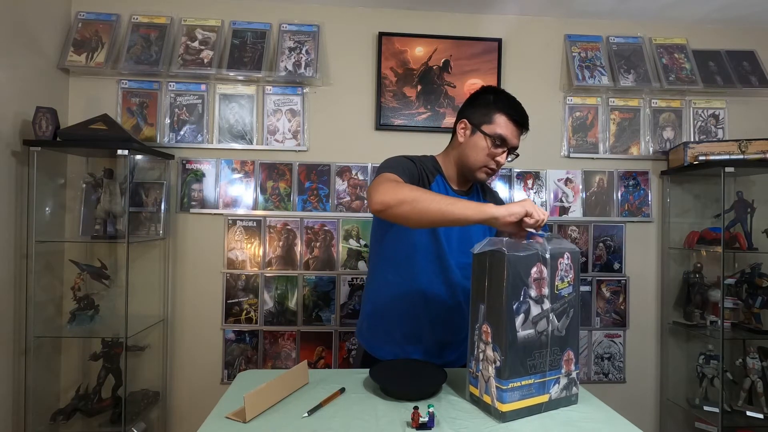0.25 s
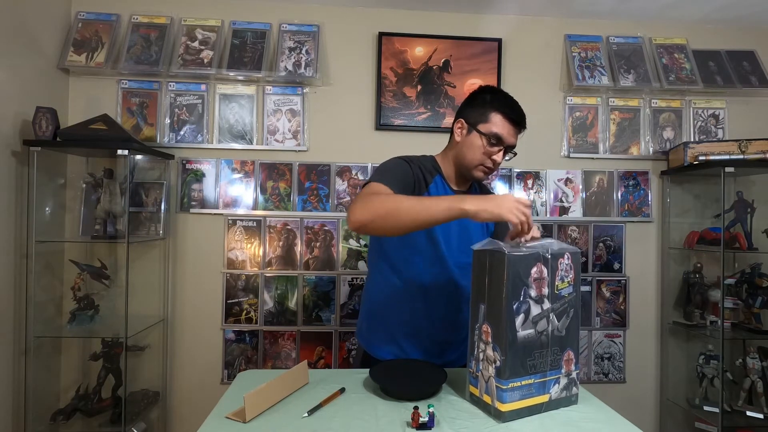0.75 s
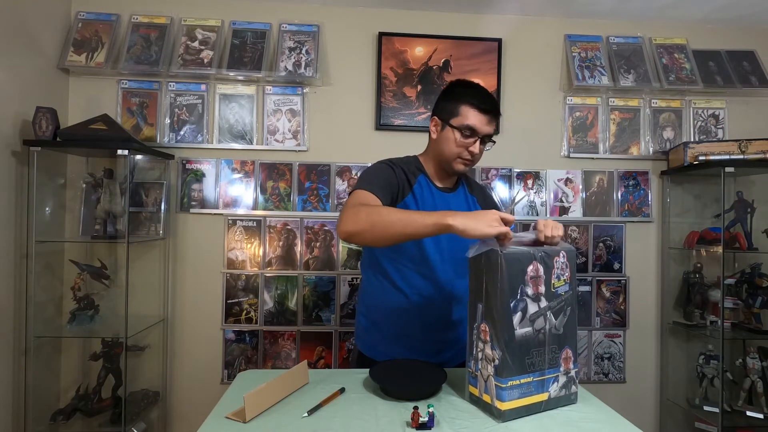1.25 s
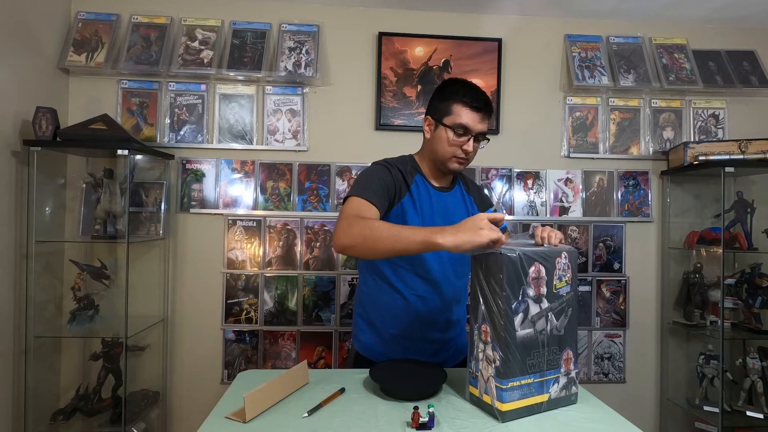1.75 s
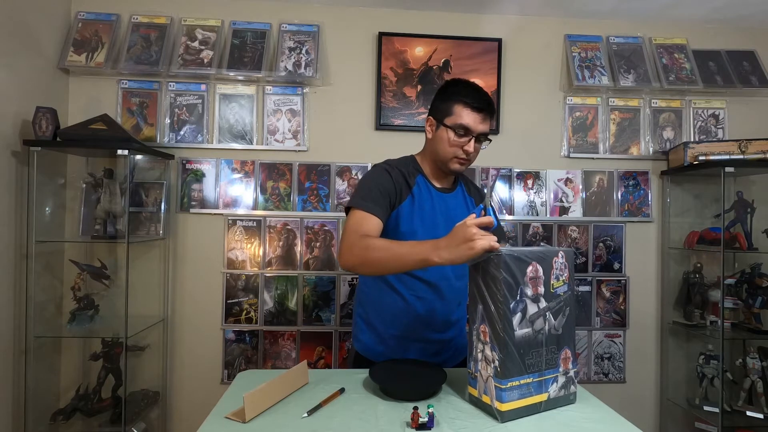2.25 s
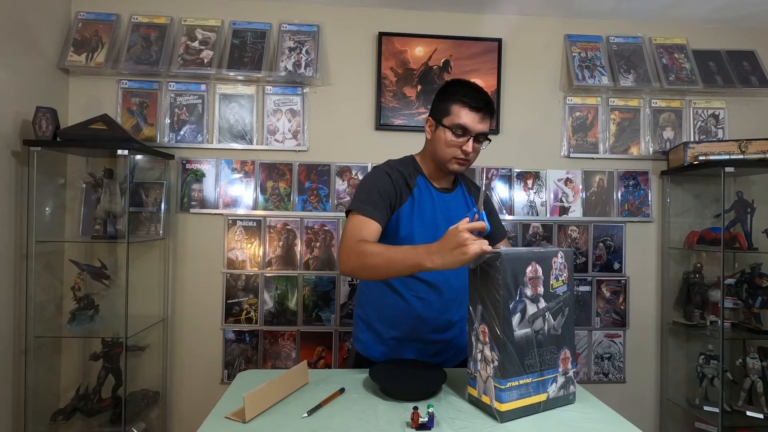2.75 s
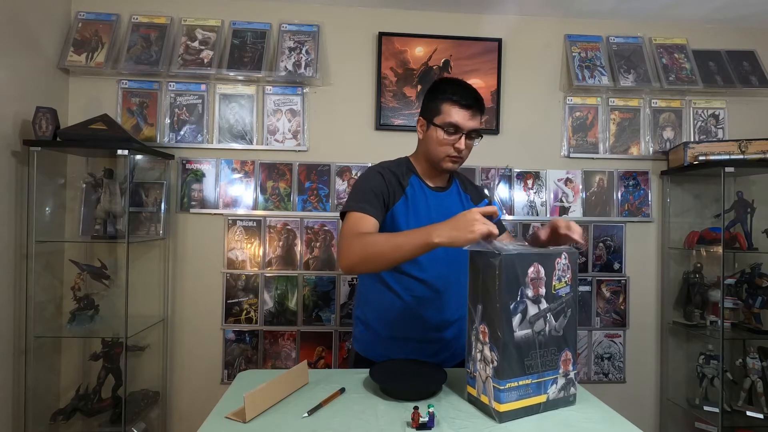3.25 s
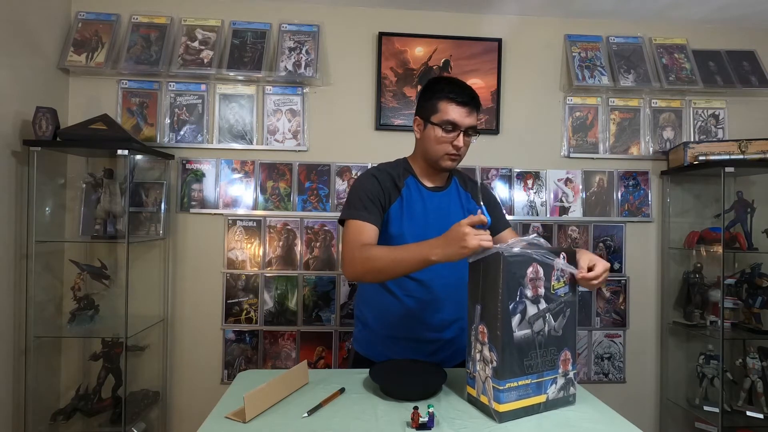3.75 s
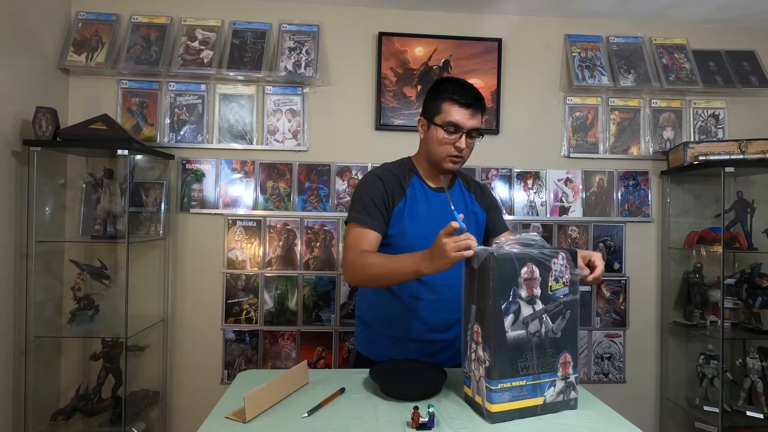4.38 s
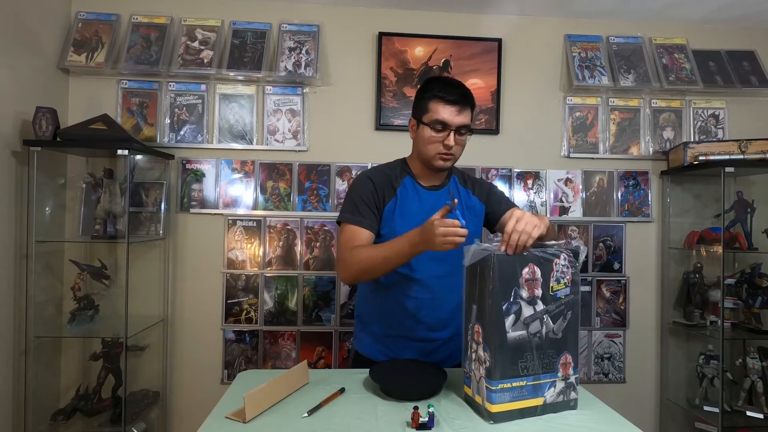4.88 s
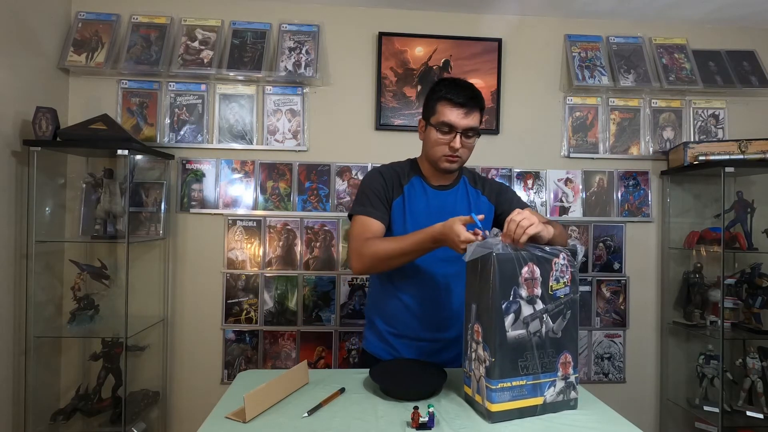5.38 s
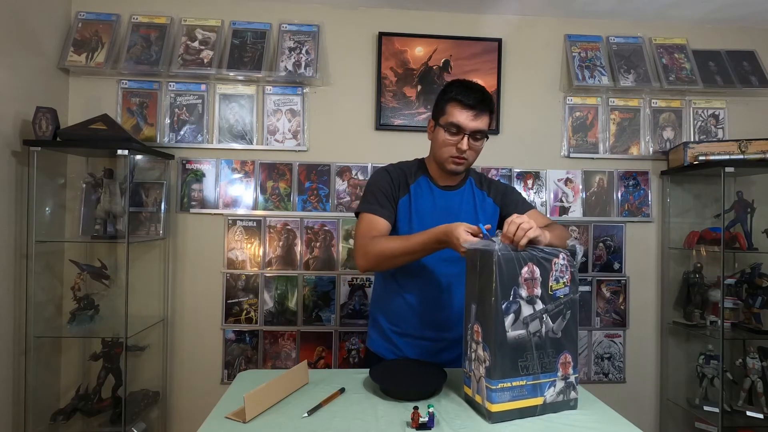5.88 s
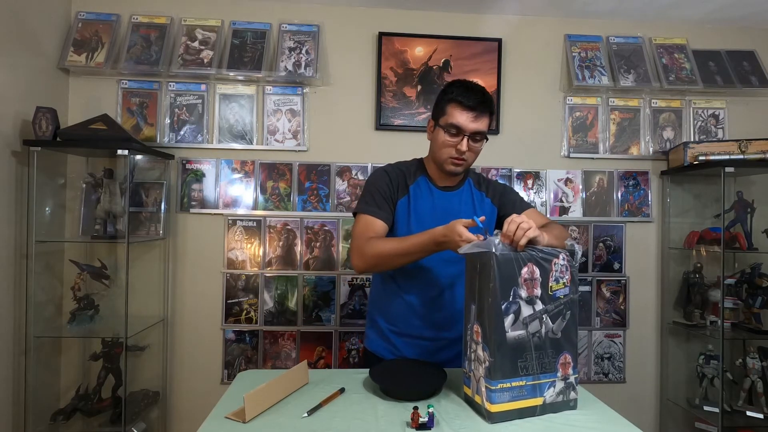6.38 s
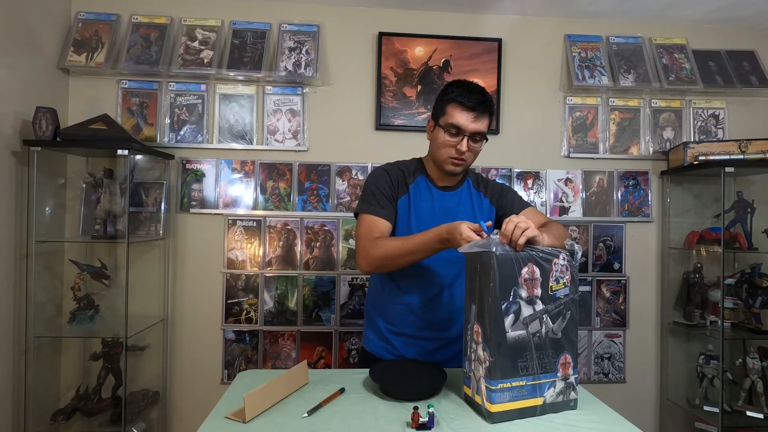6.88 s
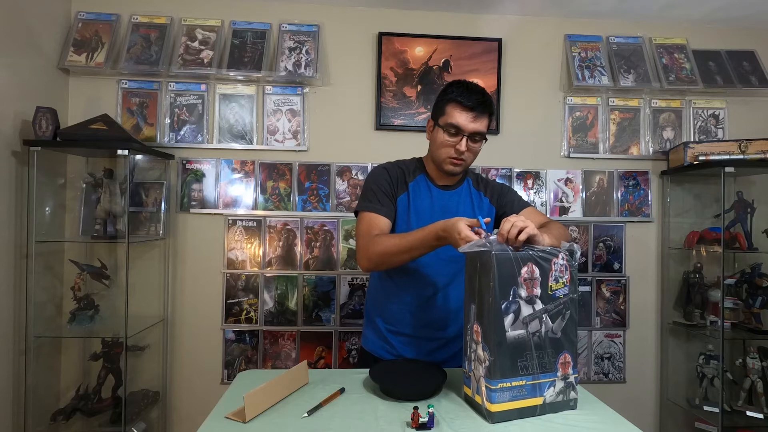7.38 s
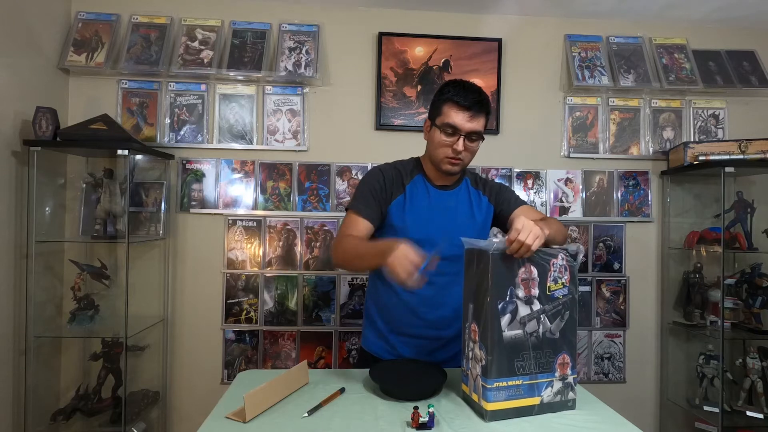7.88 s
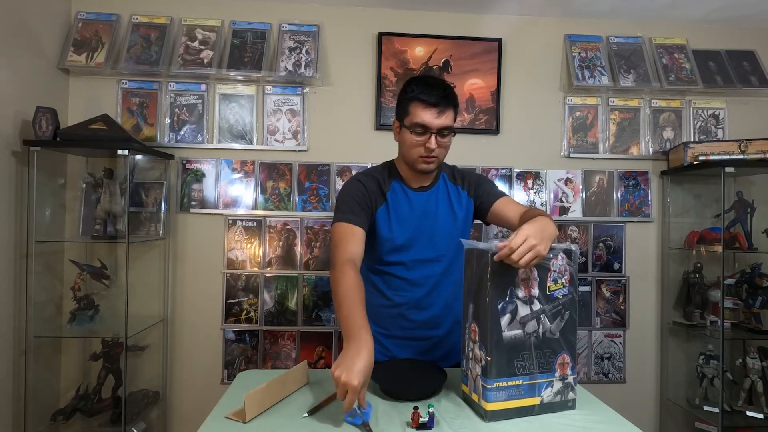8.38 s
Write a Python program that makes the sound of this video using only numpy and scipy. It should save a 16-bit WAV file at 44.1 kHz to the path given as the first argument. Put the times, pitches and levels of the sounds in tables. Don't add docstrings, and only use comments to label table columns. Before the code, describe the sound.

Hands tug and tear clear plastic film on a cardboard box in a furnished room. Irregular dry crackles and sharp snaps come in short pulls, busier at first, then sparser as a seam is picked. Near the end a small cutter taps the table, lands and bounces. Soft low thumps of moving air buffet the stereo microphone a few steps away, over a steady house hum.

```python
import sys
import numpy as np
from scipy import signal
from scipy.fft import rfft, irfft
from scipy.io import wavfile
from scipy.ndimage import uniform_filter1d

SR = 44100
rng = np.random.default_rng(int(sys.argv[2]) if len(sys.argv) > 2 else 0)


def gain_from_decibels(decibels):
    exponent = np.asarray(decibels, float) / 20
    return 10 ** exponent


def master(y):
    cut = np.clip(np.atleast_2d(y).T, -1, 1)
    pcm = np.round(cut * 32767)
    wavfile.write(sys.argv[1], SR, pcm.astype(np.int16))


N = 381024

# start_s, length_s, level_db, change_during_pull_db
PULLS = [(0, 0.26, -45.5, -32), (0.338, 0.18, -41, -12.5), (0.626, 0.3, -54.5, 3), (0.85, 0.16, -43, -12.5),
         (1.021, 0.29, -48, 5.5), (1.396, 0.28, -46.5, -4), (1.767, 0.13, -55.5, 2.5),
         (1.968, 0.3, -51.5, 0), (2.3, 0.14, -53, -1), (2.516, 0.41, -51.5, -18.5), (2.948, 0.27, -52, 4),
         (3.189, 0.048, -43.5, -7.5), (3.308, 0.04, -56, 2), (3.438, 0.15, -56.5, 11.5),
         (3.629, 0.36, -47, 0), (4.087, 0.1, -55.5, 6.5), (4.234, .18, -42.5, -7.5),
         (4.456, 0.19, -44.5, -11), (4.8, 0.069, -60, -5), (4.882, 0.21, -60, 6.5),
         (5.144, 0.17, -51.5, -9), (5.43, 0.38, -60.5, -6.5), (5.759, 0.09, -51, -6.5),
         (6.07, 0.21, -63, 5), (6.545, 0.22, -64.5, 0), (6.93, 0.13, -71.5, 5), (6.8, 0.062, -66.5, -7),
         (7.217, .25, -70, 5), (7.549, 0.27, -44.5, -21), (7.86, 0.36, -61.5, 8), (8.412, 0.1, -58, 1)]
SLACK_DB, GRIP_DB_PER_S, LET_GO_DB_PER_S = -77.5, 899, 297
# frequency_hz, density_db_per_hz
FILM_SPECTRUM = [(700, -5), (1200, 5), (2400, 3), (4200, 5), (6000, 2.5), (8600, -3), (12500, -15.5),
                 (15500, -12)]
SIZES_HZ = np.geomspace(750, 13000, num=14)
# start_s, peak_db, ring_hz, treble_over_peak_db
TEAR_SNAPS = [(.001, -31, 2430, -22), (0.332, -28.5, 3420, -7), (0.3411, -29.5, 2230, -16),
              (0.4, -31.5, 2200, -11), (0.482, -33, 2570, -23), (0.634, -38.5, 4270, -9),
              (0.7267, -30.5, 3680, -14), (0.8276, -38, 3400, -33), (0.873, -30.5, 3730, -13),
              (0.9169, -28, 1930, -25.5), (1.0351, -35, 2593, -30), (1.2034, -42, 2330, -34),
              (1.413, -34.5, 3000, -41), (1.6477, -30, 2320, -4.5), (1.7235, -27, 4550, -5.5),
              (1.8211, -37.5, 2530, -10), (1.9973, -38, 4450, -22), (2.0665, -33.5, 2370, -14),
              (2.546, -42.5, 1509, -2), (2.7243, -37.5, 2938, -13), (2.797, -35.5, 2924, -6.5),
              (2.943, -48.5, 1824, 10), (3.122, -32.5, 2854, -30), (3.1975, -33, 2130, -32),
              (3.22, -37, 5970, -2), (3.4232, -39, 3550, -7), (3.6509, -27, 4700, -13),
              (3.9733, -40, 3420, -22), (4.2734, -39, 2958, -32), (4.3319, -33.5, 1824, -17)]
# start_s, peak_db, ring_hz, treble_over_peak_db
PICK_SNAPS = [(4.89, -31, 1268, -18), (4.998, -41, 3133, -6), (5.028, -30.5, 3200, -5.5),
              (5.152, -29.5, 1772, -8), (5.217, -36.5, 2160, -33), (5.443, -39, 1473, -28),
              (5.6045, -39, 2830, -10.5), (5.7563, -36.5, 1870, -18), (5.835, -34.5, 2694, -20),
              (6.0896, -28, 3905, -5.5), (6.2163, -28.5, 1740, -14.5), (6.3551, -47, 1775, -26),
              (6.545, -41.5, 1786, -29), (6.6322, -38, 2440, -18), (6.6824, -36.5, 1910, -10.5),
              (6.7168, -38, 3918, -29), (6.9025, -40, 3900, -14), (6.993, -35.5, 2303, -25),
              (7.2448, -45, 1482, -41), (7.2928, -38, 1990, -12.5), (7.3442, -30.5, 2736, -16.5),
              (7.418, -33, 1467, -10.5), (7.538, -32, 2470, -23), (7.5433, -20, 2400, -16.5),
              (7.7309, -41, 1311, -34), (7.86, -40.5, 4000, -18), (7.926, -33.5, 1490, -8.5),
              (8.0282, -34, 4433, -6), (8.1234, -38.5, 1818, -7), (8.315, -33.5, 4756, -9)]
# start_s, peak_db, ring_hz, treble_over_peak_db
SMALL_SNAPS = [(0.2162, -39.5, 1350, -25), (0.4183, -24.5, 1930, -22), (0.5906, -42, 1860, -18),
               (0.6722, -42, 1490, -29), (0.7563, -28, 2350, -9), (1.4813, -37, 3019, -21),
               (1.5897, -33.5, 2560, -15), (1.8682, -35, 3800, -20), (1.9756, -35, 4340, -26),
               (2.0444, -33, 1910, -21), (2.2043, -33.5, 3300, -13), (2.3228, -34.5, 3140, -8),
               (2.432, -34.5, 1430, -17), (2.4775, -41, 2630, -22), (2.504, -35, 3620, -21),
               (2.6997, -44.5, 1371, -33), (2.759, -36, 3240, -27), (2.9025, -45, 4993, -16),
               (2.9845, -30.5, 3220, -8), (3.4938, -37, 3313, -26), (3.6758, -32, 2430, -11),
               (3.7082, -39.5, 1913, -12), (3.8652, -30, 3526, -8), (4.116, -47, 1267, 1),
               (4.1776, -37, 4516, -16), (4.2306, -40, 1970, -11), (4.4624, -37.5, 2377, -18),
               (4.6267, -52, 1883, -21), (4.8073, -47, 1570, -23), (5.1263, -42, 1847, -13),
               (5.418, -47, 1205, -10), (5.5818, -40.5, 1650, -13), (5.675, -49, 1217, -20),
               (5.7033, -46, 2893, -23), (6.0466, -47, 1203, -13), (6.509, -53, 1220, -23),
               (6.764, -38, 3500, -14), (7.1169, -53, 1230, -28), (7.2194, -47, 1235, -18),
               (7.6783, -41, 2334, -20), (7.8016, -39, 1384, -25), (8.1627, -36.5, 1362, -15),
               (0.309, -47, 1600, -45), (7.908, -38, 950, -45), (6.9, -36, 1270, -30),
               (6.566, -39, 4500, 0), (7.9, -36, 1100, -34), (3.9, -31.5, 1300, -30),
               (6.219, -26.5, 650, -38), (1.5, -30, 3800, -20), (0.67, -34, 6500, -25),
               (1.626, -38, 4500, -18), (1.638, -40, 8000, -5), (1.808, -42, 2900, -20),
               (3.782, -35, 2700, -11), (4.7, -33, 2200, -10), (8.4, -44, 1780, -19),
               (6.889, -55, 2670, -37), (7.032, -40, 2670, -25), (6.5, -47, 12000, 1), (8.5, -37, 5014, -5),
               (7.549, -26, 2700, -17), (6.2, -45, 3000, -5), (8.487, -58, 4500, -8),
               (3.982, -27, 3400, -8)]
# start_s, peak_db, ring_hz
BRIGHT_TICKS = [(0.838, -53, 8640), (1.097, -52, 8700), (1.1694, -65, 7740), (1.4274, -48, 8960),
                (1.9085, -57, 8460), (2.094, -44, 7630), (2.159, -46, 8400), (2.261, -46, 8300),
                (2.9113, -53, 7720), (3.7458, -56, 8490), (3.9817, -52, 8850), (4.0375, -39, 8500),
                (4.085, -44.5, 8360), (4.115, -43, 8690), (4.177, -45.5, 8850), (4.5038, -44.5, 8144),
                (4.573, -46, 8370), (4.644, -46, 8600), (5.299, -64, 7520), (5.7196, -51, 8830),
                (6.517, -65, 8186), (8.1762, -45.5, 8285), (8.321, -38.5, 7790), (8.4342, -45, 9420)]
PRICK_DB = 13
AIMED_DB = -9
# start_s, peak_db, rattle_length_s, landing_share (0-1)
KNOCKS = [
    (8.3333, -28.5, 0.025, 0),
    (8.5011, -15.5, 0.018, 0.8),
    (8.5432, -12.5, 0.018, 0.92),
    (8.593, -41, 0.014, 0.9),
]
# frequency_hz, width_hz, level_db
TOUCH_MODES = [(730, 220, 6), (1010, 71, 9), (1810, 154, 4), (2430, 147, -5), (2698, 73, 1),
               (2930, 147, 3.5), (3800, 234, -24), (4710, 300, -21), (5900, 357, -11)]
# frequency_hz, width_hz, level_db
LANDING_MODES = [(525.7, 38, 4), (1049, 1400, 12.5), (1760, 80, -8), (2330, 750, 6), (3900, 1200, 6.5),
                 (3420, 110, 9), (2325, 79, -1), (645, 204, 6), (5096, 730, -10)]
# left_delay_ms, right_delay_ms, level_db
NEAR_ECHOES = [(0.43, 0.34, -14), (1.13, 1.33, -16.5), (2.3, 2.05, -14), (3.7, 4.1, -13), (5.9, 5.3, -11)]
# frequency_hz, t60_s
ROOM_DECAY = [(500, 0.39), (1300, 0.34), (3500, 0.29), (9000, 0.2), (15000, 0.23)]
# frequency_hz, level_db
WALL_COLOUR = [(1000, -4), (4000, 1.36), (8000, -2), (13000, -1)]
# frequency_hz, left_over_right_db
PORT_BALANCE = [(500, -1), (2400, 1), (4400, 0), (8000, -1.5), (15000, -7)]
LEFT_SHARE = 1 / 2
LAG = 1.8
# frequency_hz, level_db
MIC_RESPONSE = [(9000, 2), (13000, -5.5), (15000, -16), (16000, -10), (17000, -57)]
# start_s, length_s, level_db, flutter_over_rumble_db
LEFT_GUSTS = [(.243, 0.12, -25, -15), (.42, 0.12, -36, -10), (1.152, 0.16, -27, -15),
              (1.608, 0.081, -26, -20), (1.726, 0.15, -32, -12), (2.018, 0.38, -24, -11),
              (2.515, 0.18, -24.5, -11), (3.041, 0.085, -21, -16), (3.17, 0.17, -27.5, -10),
              (3.43, 0.06, -24.5, -9), (3.866, 0.097, -34, -18), (4.145, 0.19, -27, -17),
              (4.408, 0.12, -26, -17), (4.875, 0.18, -33, -12), (5.195, 0.27, -24.5, -11),
              (5.43, 0.05, -31.5, -14), (6.297, 0.0974, -24, -10.5), (6.553, 0.43, -25.5, -14),
              (7.05, 0.26, -29.5, -14), (7.41, 0.31, -27, -18), (7.859, 0.11, -26.5, -9),
              (8.018, 0.14, -25.5, -17.5), (8.184, 0.14, -27, -13.5), (8.351, 0.13, -21.5, -15.5),
              (8.58, 0.084, -27.5, -14)]
# start_s, length_s, level_db, flutter_over_rumble_db
RIGHT_GUSTS = [(.125, 0.26, -28, -14), (.85, 0.23, -41, -8), (1.188, 0.14, -26, -6), (1.401, 0.14, -25, -9),
               (1.617, 0.18, -26.5, -9), (2.109, 0.085, -27, -8), (2.259, 0.14, -26, -4),
               (2.52, 0.16, -25.5, -7), (2.93, 0.095, -25, -10), (3.084, 0.18, -23, -6),
               (3.44, 0.052, -27, -3), (3.599, 0.099, -34, -16), (3.85, 0.13, -26.5, -7),
               (4.165, 0.1293, -21, -4), (4.42, 0.12, -27, -8), (4.91, 0.11, -28, -6),
               (5.204, 0.2, -27, -5), (5.51, 0.14, -34, -15), (5.75, 0.11, -32, -17),
               (6.261, 0.073, -23.5, -7), (6.397, 0.059, -25.5, -6), (6.56, 0.19, -33, -10),
               (6.837, 0.18, -22, -7), (7.224, 0.077, -33, -15), (7.42, 0.12, -36, -12),
               (7.637, 0.11, -27.5, -13), (7.83, 0.13, -24.5, -7), (8.03, 0.36, -24, -4)]
CALM_DB, CALM_FLUTTER_DB = -49, -12
GUST_RISE_DB_PER_S, GUST_FALL_DB_PER_S = 520, 230
# start_s, peak_db, sharpness_db, lean_left_db
EDDIES = [(1.221, -25, -15, -28), (1.27, -25.5, -26.5, -11), (1.481, -25.5, -27, -20),
          (1.641, -26.5, -30, -10.5), (1.801, -33.5, -12, -3), (2.15, -25.5, -13, 2),
          (2.264, -23.5, -9, 14), (2.333, -15.5, -16, 6), (2.398, -20, -11.5, 8), (2.528, -22.5, 1, 5),
          (2.545, -23.5, -7.5, 3.5), (2.996, -27, -19, -22), (3.183, -25, -11, 8), (3.458, -16, -11.5, -1),
          (3.972, -24, -14.5, -28), (4.198, -25.5, -11.5, -26.0), (4.432, -21, -15.5, 1.5),
          (5.241, -18.5, -20.5, 10), (5.355, -20, -12.5, 3), (6.298, -24.5, -26, -25),
          (6.419, -19, -22, -37), (6.853, -28.5, -12.5, 11), (6.896, -30, -4, -31),
          (6.981, -21.5, -24, -14), (7.541, -32.5, -15.5, 5), (7.861, -23, -26, -21),
          (7.914, -23.5, -16, -18), (8.143, -22, -8.5, -25), (8.286, -25, -15.5, -26),
          (8.361, -27, -15, -1), (8.197, -24, -10, -23), (.276, -28, -20.5, 10), (0.303, -28.5, -29, 3),
          (2.104, -53, -11, -10), (3.868, -42, -12, -7), (4.508, -31, -17, -2), (4.52, -29.5, -16.5, -3),
          (4.927, -37, -22, -13), (4.947, -42, -21, -2), (6.051, -38.5, -27, -2),
          (6.906, -25.5, -12.5, -21), (8.093, -30, -22, -15), (8.447, -25, -18.5, 9), (2.128, -42, -17, -3),
          (2.42, -33.5, -4, 9), (2.67, -33, -12, 3), (4.225, -29.5, -9, -24), (8.17, -26.5, -15, -11),
          (1.31, -30, -19, -17), (8.061, -44, -20, 2)]
# frequency_hz, density_db_per_hz
HOUSE_SPECTRUM = [(40, 8.5), (130, -0.5), (260, 5.5), (350, -1.5), (480, -6), (600, -14.5), (860, -39),
                  (1300, -27), (2000, -33), (5000, -53), (9000, -51), (16000, -81)]
HOUSE_DB = -49
# frequency_hz, width_hz, level_db
MOTOR_TONES = [(775, 57, -74.5), (1046, 220, -71.5), (1310, 46, -83.5)]


def crinkle():
    clumps = gain_from_decibels(5.5 * evened(uniform_filter1d(rng.standard_normal(N), 500)))
    wide = ticks(220 * clumps)
    local = [ticks(300 * clumps) for _ in range(5)]
    out = np.zeros(N)
    for k, grain in enumerate(creases(1.07)):
        train = (-1) ** k * 1.28 * wide + 0.76 * local[k // 3]
        out += signal.oaconvolve(train, grain)[:N]
    slow_power = abs(uniform_filter1d(out ** 2, size=9000)) / np.mean(out ** 2)
    out /= np.sqrt(slow_power + 0.42)
    return out * pulling() * gain_from_decibels(-19)


def pulling():
    level_db, change_db = np.transpose(PULLS)[2:, :, None]
    below_db, progress = swells(PULLS, GRIP_DB_PER_S, LET_GO_DB_PER_S)
    power = gain_from_decibels(level_db + change_db * progress + below_db) ** 2
    return per_sample(np.sqrt(power.sum(0) + gain_from_decibels(SLACK_DB) ** 2))


def ticks(per_s):
    at = np.flatnonzero(rng.random(N) < per_s / SR)
    train = np.zeros(N)
    size_db = 5.4 * np.minimum(rng.exponential(1, N)[at], 3.2)
    train[at] = gain_from_decibels(size_db) * rng.choice([-1, 1], N)[at]
    return evened(train)


def creases(cycles):
    rings = np.array([ring(hz, cycles) for hz in SIZES_HZ])
    weight = gain_from_decibels(read(FILM_SPECTRUM, SIZES_HZ)) * np.sqrt(SIZES_HZ / 3200)
    return rings * (weight / np.linalg.norm(rings, axis=1))[:, None]


def ring(hz, cycles):
    turns = np.arange(400) * hz / SR
    wave = np.sin(2 * np.pi * turns) * np.exp(-turns / max(cycles, .2)) * (1 - np.exp(-turns / 0.085))
    return wave / abs(wave).max()


def snaps():
    out, bank = np.zeros(N), creases(0.58)
    large = TEAR_SNAPS + PICK_SNAPS
    for (s, db, hz, treble_db), chance in zip(large, rng.random((len(large), 3, 5))):
        add(out, s, gain_from_decibels(db) * flip(bank, hz, treble_db))
        for later, weaker, pick in chance.T:
            part = bank[int(pick * 9) + 2]
            add(out, s + .014 * later, gain_from_decibels(db - 4.5 - 15.6 * weaker) * part / abs(part).max())
    for s, db, hz, treble_db in SMALL_SNAPS:
        add(out, s, gain_from_decibels(db - 4.0) * flip(bank, hz, treble_db))
    for s, db, hz in BRIGHT_TICKS:
        add(out, s, gain_from_decibels(db + 11.0) * ring(hz, 0.54))
    return out


def flip(bank, hz, treble_db):
    near_db = 5.0 * np.exp(-(np.log2(SIZES_HZ / hz) / 0.59) ** 2)
    near_db -= 4.4 * np.maximum(np.log2(hz / SIZES_HZ) - 0.6, 0)
    signs = (-1) ** np.arange(len(bank))
    click = (gain_from_decibels(tilt(treble_db + 8.0) + near_db) * signs) @ bank
    return click / abs(click).max()


def tilt(treble_db):
    return np.multiply.outer(np.maximum(np.log2(SIZES_HZ / 3200), 0) / 1.5, treble_db)


def pricks():
    out = np.zeros(N)
    large = TEAR_SNAPS + PICK_SNAPS
    for (s, db, hz, treble_db), chance in zip(large, rng.random(len(large))):
        add(out, s, gain_from_decibels(db + treble_db + PRICK_DB) * ring(9000 + 3500 * chance, 1.0))
    return out


def sparkle():
    clumps = gain_from_decibels(6.0 * evened(uniform_filter1d(rng.standard_normal(N), 700)))
    out = []
    for hz, db in ((8000, -3), (8600, -3), (13200, 4), (13900, 5)):
        out.append(gain_from_decibels(db) * signal.oaconvolve(ticks(150 * clumps), ring(hz, 0.8))[:N])
    return np.reshape(out, (2, 2, N)).sum(0) * pulling() * gain_from_decibels(-44)


def cutter():
    out, t = np.zeros(N), np.arange(4000) / SR
    for s, db, length, share in KNOCKS:
        share = np.clip(share, 0, 1)
        rattle = rng.standard_normal(len(t)) * abs(rng.standard_normal(len(t))) * np.exp(-t / length)
        rattle[:3] += 3.2
        sound = (0.36 + 0.16 * share) * evened(colour(rattle, FILM_SPECTRUM) * (t > 0))
        for modes, part in ((TOUCH_MODES, 1 - share), (LANDING_MODES, share)):
            bell = np.zeros(len(t))
            for k, (hz, width, level) in enumerate(modes):
                decay = np.exp(-np.pi * width * t)
                bell += (-1) ** k * gain_from_decibels(level) * width * np.sin(2 * np.pi * hz * t) * decay
            sound += part * evened(signal.fftconvolve(rattle, bell)[:len(t)])
        add(out, s, gain_from_decibels(db) * sound / abs(sound).max())
    return out


def echoed(pair):
    taps = np.zeros((2, 400))
    taps[:, 0] = 1
    for k, (left_ms, right_ms, db) in enumerate(NEAR_ECHOES):
        delays = np.round(np.array([left_ms, right_ms]) * SR / 1000).astype(int)
        taps[[0, 1], delays] = (-1) ** k * gain_from_decibels(db)
    return signal.oaconvolve(pair, taps / np.linalg.norm(taps[0]), axes=1)[:, :N]


def room(x):
    slots = np.arange(40, SR // 2 - 20, 14)
    taps = np.zeros((4, 3, SR // 2))
    places = slots + rng.integers(0, 14, (4, 3, len(slots)))
    np.put_along_axis(taps, places, rng.choice([-1., 1.], (4, 3, len(slots))), 2)
    hz, t, z = signal.stft(taps, SR, nperseg=128)
    same = np.clip(read([(600, 0.94), (2400, 0.77), (5000, 0.26), (10000, 0.1)], hz), 0, 1)[:, None]
    z = same * z[:, 2:] + np.sqrt(1 - same ** 2) * z[:, :2]
    rise = np.minimum(1.34 + t / 0.027, 1)
    decay_db = read(WALL_COLOUR, hz)[:, None] - 60 * t / read(ROOM_DECAY, hz)[:, None]
    tails = signal.istft(z * rise * gain_from_decibels(decay_db), SR, nperseg=128)[1]
    turn = 2 * np.pi * 8.3 * np.arange(N) / SR
    slow, quick = (np.array([np.cos(a), np.sin(a)]) for a in (turn, 2.7 * turn))
    feeds = (slow[:, None] * quick).reshape(4, 1, N) * x
    return signal.oaconvolve(feeds, tails / np.linalg.norm(tails[0, 0]), axes=2).sum(0)[:, :N]


def draught():
    left, right = gusting(LEFT_GUSTS), gusting(RIGHT_GUSTS)
    strength, flutter_db = np.array([left[0], right[0]]), np.array([left[1], right[1]])
    speed = np.clip(2 ** ((flutter_db + 12.5) / 11), .4, 3.5)
    spectrum = [(40, -2.0), (120, 4.0), (280, -3.5), (500, -12.5), (1000, -29.5), (2000, -58.5)]
    lumps = evened(colour(rng.standard_normal((2, 2 ** 18)), spectrum))
    gusts = evened(uniform_filter1d(uniform_filter1d(rng.standard_normal((2, 2 ** 18)), 250), 250))
    field = evened(lumps * gain_from_decibels(5.82 * gusts))
    place = np.cumsum(speed, axis=1) / 4 % (2 ** 18 - 1)
    air = np.array([np.interp(p, np.arange(2 ** 18), f) for p, f in zip(place, field)])
    out = air * strength / np.sqrt(abs(uniform_filter1d(air ** 2, size=5000)) + 0.15)
    add_eddies(out)
    bent = 0.62 * np.tanh(out / 0.46)
    band = signal.butter(N=2, Wn=[29, 1500], btype="band", fs=SR, output="sos")
    return signal.sosfilt(band, bent)


def add_eddies(out):
    for (s, db, sharp_db, lean), chance in zip(EDDIES, rng.random((len(EDDIES), 2, 2))):
        hz = np.array([[130], [190]]) * 2 ** (np.clip(sharp_db + 4.0, -15, 15) / 14)
        u = np.arange(-900, 900) / SR * hz * 6.74
        phase = 2 * np.pi * chance[:, :1]
        push = np.cos(1.47 * u + phase) / (1 + u ** 2 / 3) ** 1.97 * np.hanning(1800)
        add(out, s + 0.00608 - 900 / SR, gain_from_decibels(port_db(db + 4.5, lean))[:, None] * push)


def port_db(mid_db, lean_db):
    lean_db = np.clip(lean_db, -25, 25)
    return mid_db + 10 * np.log10(4 / (1 + gain_from_decibels([-2 * lean_db, 2 * lean_db])))


def gusting(rows):
    level_db, flutter_db = np.transpose(rows)[2:, :, None]
    power = gain_from_decibels(level_db + swells(rows, GUST_RISE_DB_PER_S, GUST_FALL_DB_PER_S)[0]) ** 2
    calm = gain_from_decibels(CALM_DB) ** 2
    total = power.sum(0) + calm
    flutter = ((power * flutter_db).sum(0) + calm * CALM_FLUTTER_DB) / total
    return per_sample(np.sqrt(total)), per_sample(flutter)


def house():
    common, own = rng.standard_normal(N), rng.standard_normal((2, N))
    out = gain_from_decibels(HOUSE_DB) * evened(colour(common + 0.16 * own, HOUSE_SPECTRUM))
    hz_axis = np.fft.rfftfreq(N, 1 / SR)
    for hz, width, db in MOTOR_TONES:
        resonance = 1 / (1 + ((hz_axis - hz) / width * 2) ** 2)
        out += gain_from_decibels(db) * evened(irfft(rfft(common) * resonance, N))
    return out


def swells(rows, rise_db_per_s, fall_db_per_s):
    t = np.arange(0, N + 64, 64) / SR
    start, length = np.transpose(rows)[:2, :, None]
    below_db = -rise_db_per_s * np.maximum(start - t, 0)
    below_db = below_db - fall_db_per_s * np.maximum(t - start - length, 0)
    return below_db, np.clip((t - start) / length, 0, 1)


def per_sample(slow):
    return np.interp(np.arange(N) / 64, np.arange(len(slow)), slow)


def evened(x):
    return x / np.sqrt(np.mean(x ** 2, axis=-1, keepdims=True) + 1e-20)


def read(points, hz):
    f, value = np.transpose(points)
    return np.interp(np.log(hz + 1), np.log(f + 1), value)


def colour(x, points, share=1):
    hz = np.fft.rfftfreq(x.shape[-1], 1 / SR)
    return irfft(rfft(x) * gain_from_decibels(share * read(points, hz)), x.shape[-1])


def add(mix, s, sound):
    part = mix[..., round(s * SR):][..., :sound.shape[-1]]
    part += sound[..., :part.shape[-1]]


def scene():
    film, flips = crinkle(), snaps()
    table = film + flips + cutter()
    direct = table + pricks() + gain_from_decibels(AIMED_DB) * flips
    late = irfft(rfft(direct) * np.exp(-2j * np.pi * np.fft.rfftfreq(N) * LAG), N)
    heard = echoed(np.array([late, direct])) + gain_from_decibels(3.0) * room(table)
    left = colour(heard[0], PORT_BALANCE, LEFT_SHARE)
    right = colour(heard[1], PORT_BALANCE, LEFT_SHARE - 1)
    return np.array([left, right]) + draught() + house() + gain_from_decibels(1.5) * sparkle()


def band_limit(x):
    return signal.sosfilt(signal.butter(12, 15850, fs=SR, output="sos"), x)


def record(dry):
    mix = colour(dry, MIC_RESPONSE)
    return band_limit(mix)


dry = scene()
out = record(dry)
master(out)
```